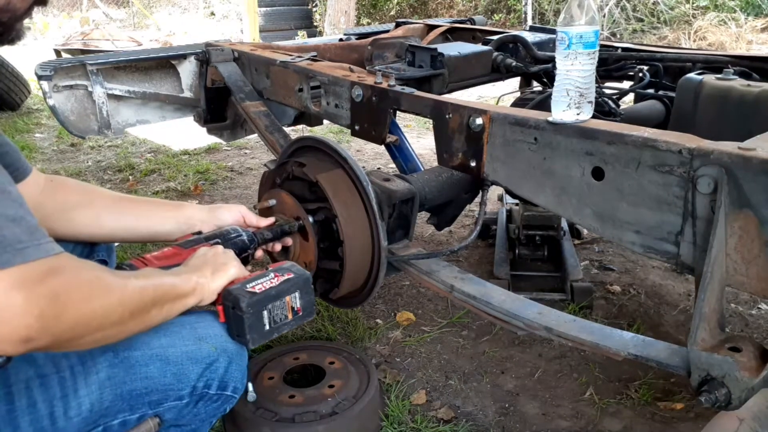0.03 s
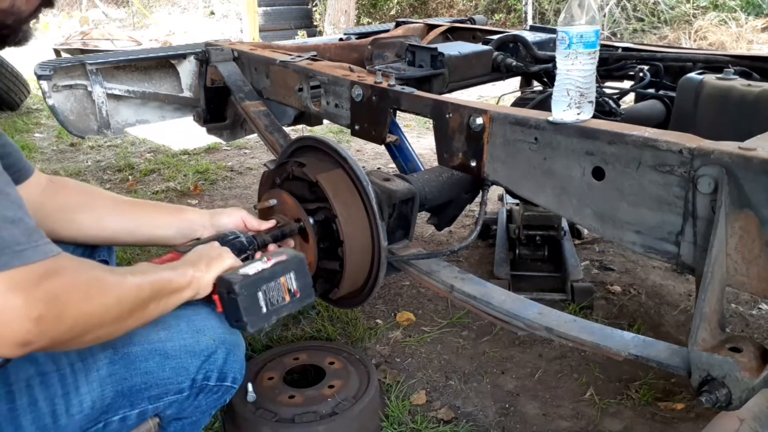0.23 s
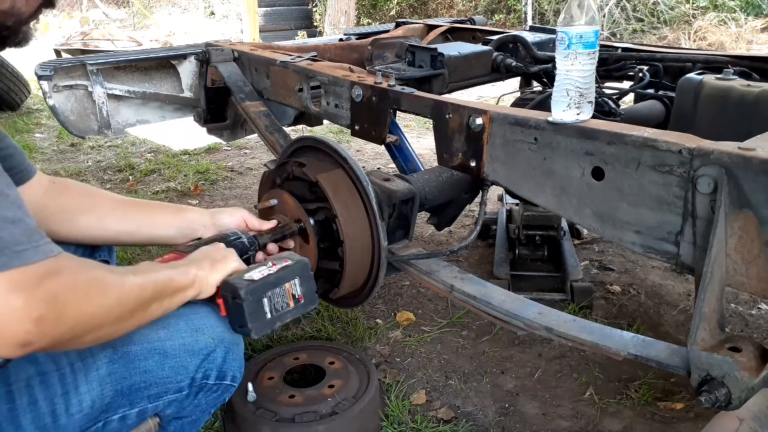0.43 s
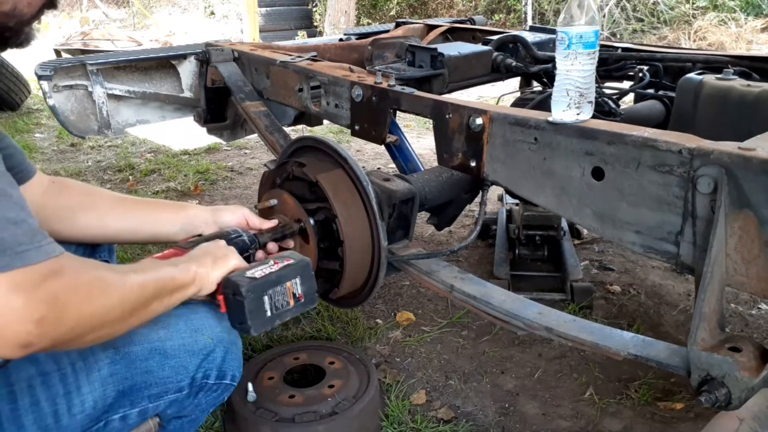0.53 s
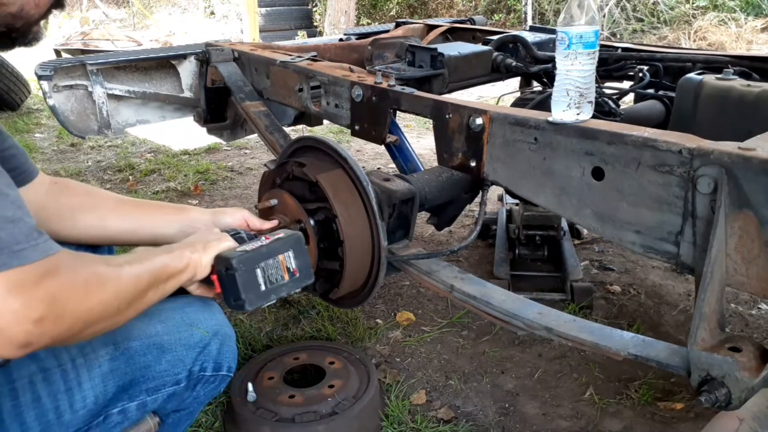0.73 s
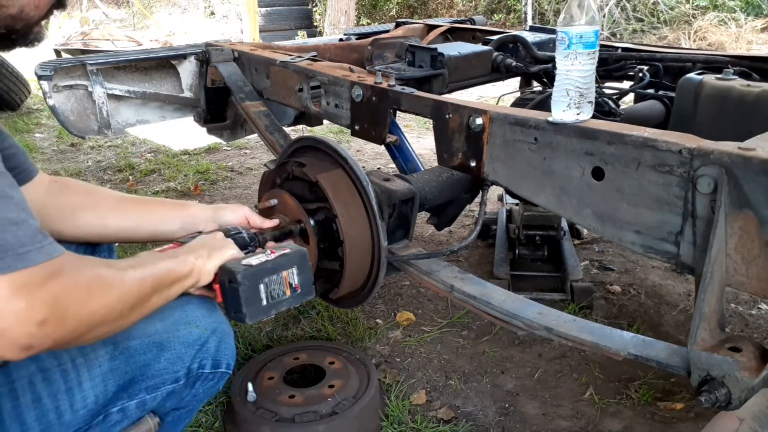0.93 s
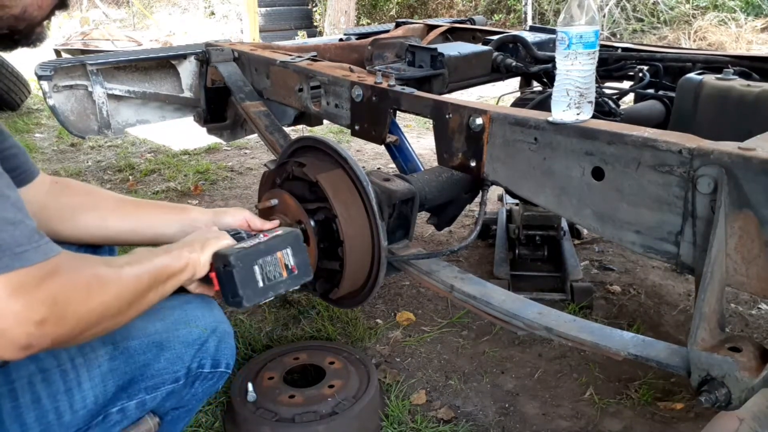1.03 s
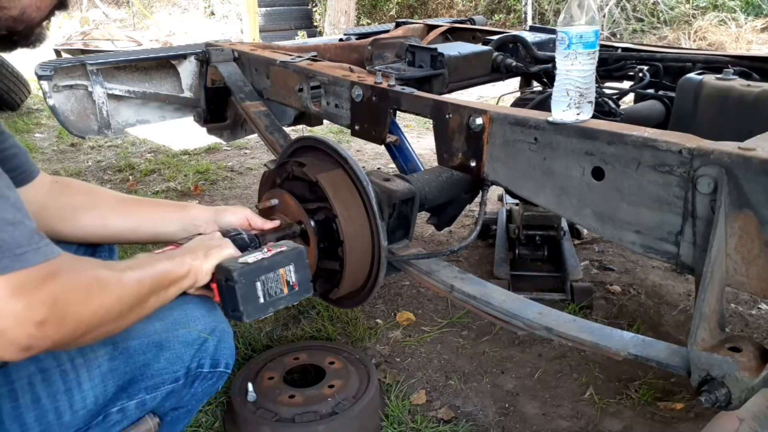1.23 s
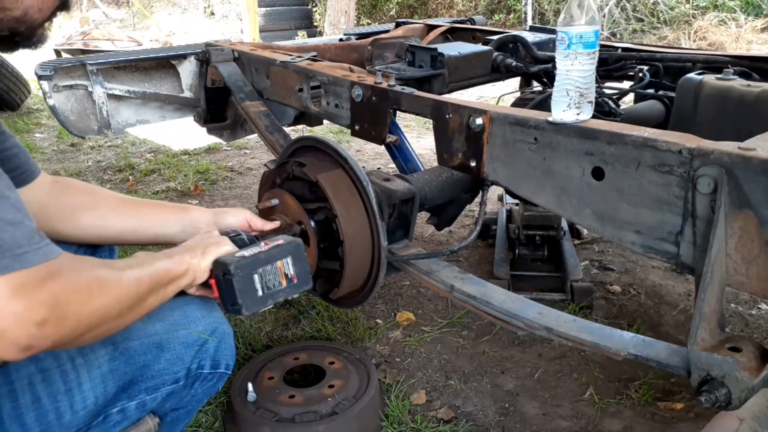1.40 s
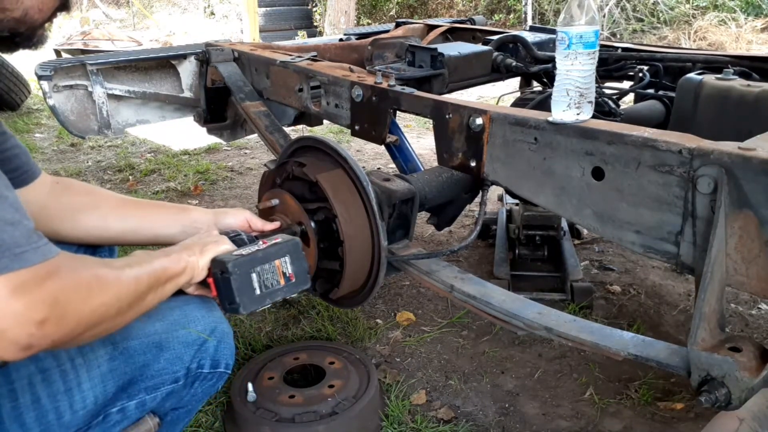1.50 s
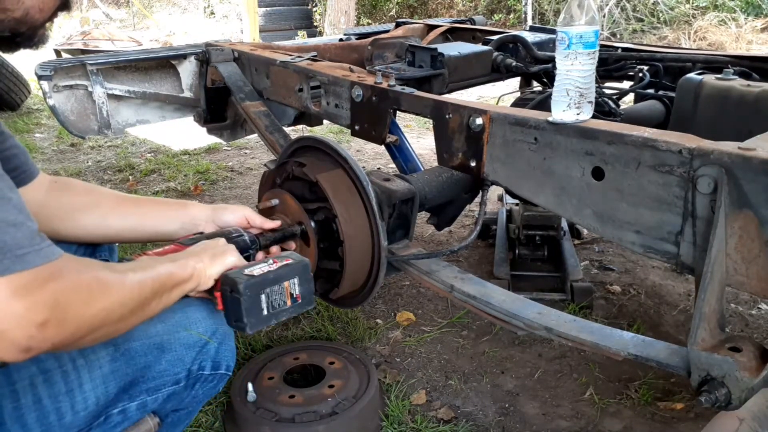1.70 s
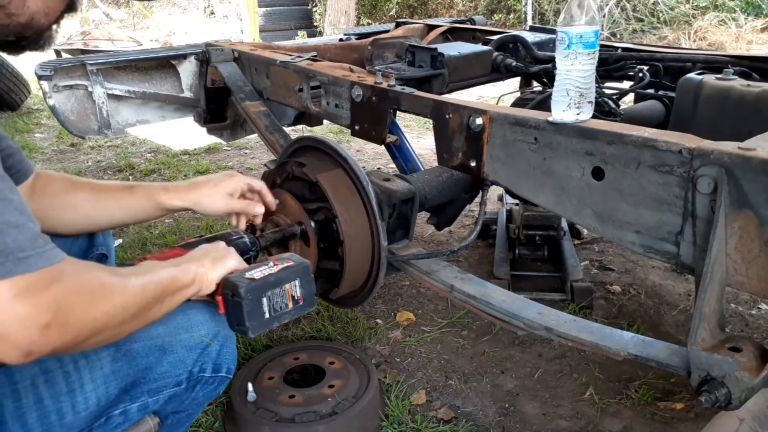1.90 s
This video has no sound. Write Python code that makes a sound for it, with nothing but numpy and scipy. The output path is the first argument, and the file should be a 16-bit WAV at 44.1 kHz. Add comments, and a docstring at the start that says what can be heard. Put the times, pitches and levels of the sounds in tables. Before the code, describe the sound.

A cordless impact wrench runs four short bursts on a wheel nut, close and slightly left, at about 0.2, 0.7, 1.0 and 1.4 seconds. Each starts with small clicks and a motor whine, then rapid hammering rings the steel with a brief echo. The hardest blows thump the microphone near 0.3 and 1.6 seconds. The wrench stops around 1.7 seconds; a faint low hum continues throughout.

```python
"""A cordless impact wrench, close to a stereo microphone pair, runs four short bursts on a truck's wheel nut.
Each time the motor whines and spins up, then the hammer strikes about thirty times a second, often
twice in quick succession. Socket, hub and brake drum ring, and the hardest blows thump the microphones,
mostly the left. The work space answers from all around, and a low hum goes on in the background."""
import sys
import numpy as np
from scipy import signal
from scipy.fft import rfft, irfft
from scipy.io import wavfile
from scipy.ndimage import uniform_filter1d

SR = 44100
rng = np.random.default_rng(int(sys.argv[2]) if len(sys.argv) > 2 else 0)


def to_wav(sig):
    """Store sig (one row per channel, or 1-D mono) as 16-bit WAV at the path in sys.argv[1].

    Samples outside -1..1 are clipped; the rate is SR.
    """
    pcm = np.clip(np.atleast_2d(sig), -1, 1) * 32767
    pcm = np.round(pcm).astype(np.int16)
    wavfile.write(sys.argv[1], SR, pcm.T)  # frames by channels


N = 85995
T = np.arange(N) / SR
TOOL_LEFT_DB = 3  # the wrench sits a little left of centre


def amp(db):
    return 10 ** (np.asarray(db) / 20)

def unit_rms(x):
    return x / np.sqrt(np.mean(x ** 2) + 1e-20)

def curve_at(points, hz):
    f, value = np.transpose(points)
    return np.interp(np.log(hz + 1), np.log(f + 1), value)

def pan(left_db):
    return amp(np.array([[left_db], [-left_db]]) / 2)

def add(mix, s, sound):
    part = mix[:, max(round(s * SR), 0):][:, :sound.shape[-1]]
    part += sound[..., :part.shape[1]]

def colour(x, spectrum):
    """Shapes the spectrum and keeps the power of white noise."""
    gain = unit_rms(amp(curve_at(spectrum, np.fft.rfftfreq(2 * N, 1 / SR))))
    return irfft(rfft(x, 2 * N) * gain)[..., :N]

def drift(hz):
    """A random wander with hz new values a second."""
    return np.interp(T * hz, np.arange(1000), rng.standard_normal(1000))

def mic_noise(size, common=0.53, lag_s=0.00014):
    """Noise at two microphones; the common part reaches the right one a little late."""
    left, other = rng.standard_normal((2, size))
    right = common * np.roll(left, round(lag_s * SR)) + np.sqrt(1 - common ** 2) * other
    return np.array([left, right])

def crack(db, rise_s=0.00034, hold_s=0.0019, fall_s=0.0014, chatter_s=0.0092):
    """Steel on steel: a dense crack, then the socket chatters briefly on the nut."""
    t = T[:SR // 20]
    strike = np.exp(-np.maximum(t - hold_s, 0) / fall_s)
    chatter = amp(-17) * np.exp(-t / chatter_s)
    shape = np.minimum(t / rise_s, 1) * (strike + chatter)
    return amp(db) * unit_rms(mic_noise(len(t)) * shape) * np.sqrt(np.mean(shape ** 2))


# Partials of the background hum: f/Hz, level/dB
HUM_PARTIALS = [(119.5, -47.5), (241, -62), (291, -75), (481, -72), (662, -68), (834, -73.5)]
# The recorder's automatic gain on the background: t/s, gain/dB
BACKGROUND_GAIN = [(0, 3), (.2, 4), (.45, -3.5), (.62, -3.5), (1.0, -4), (1.4, -5), (1.95, -6.5)]
# Spectrum of the air in the work space: f/Hz, level/dB
AIR_SPECTRUM = [(25, -20.5), (55, -2.5), (90, 2.5), (200, -3.5), (350, -9.5), (700, -15.5), (1200, -21),
                (2400, -22), (4000, -26.5), (6700, -39.5), (9000, -30), (15000, -40)]

def hum(waver=0.24):
    """A wavering hum over soft air; the recorder's automatic gain turns both down once hammering starts."""
    partials = np.zeros(N)
    for hz, db in HUM_PARTIALS:
        level = np.sqrt(2) * amp(db) * (1 + waver * drift(hz=24))
        partials += level * np.sin(2 * np.pi * hz * T + waver * drift(hz=7.6))
    gain_db = np.interp(T, *np.transpose(BACKGROUND_GAIN))
    air = amp(-51.5 + 0.53 * gain_db) * colour(mic_noise(N, common=0.64), AIR_SPECTRUM)
    return partials * amp(gain_db) * pan(left_db=1.5) + air * pan(left_db=4)


# Decay of the work space: f/Hz, t60/s
ROOM_DECAY = [(200, 0.33), (600, 0.51), (2000, 0.28), (5000, 0.26), (9000, 0.2277), (15000, 0.19)]
# Its reflections at the microphones: f/Hz, level/dB
ROOM_SPECTRUM = [(100, -2), (230, 3.5), (450, -5), (800, -7), (1500, -8), (3500, -2.5), (6500, -3.5),
                 (10000, -4), (15000, -4)]

def room(direct, build_s=0.0018):
    """Dense reflections from all around the work space, dying faster in the treble."""
    hz, t, bands = signal.stft(rng.standard_normal((2, SR)), SR, nperseg=256)
    t60 = curve_at(ROOM_DECAY, hz)[:, None]
    decay = amp(curve_at(ROOM_SPECTRUM, hz)[:, None] - 60 * t / t60)
    unit_energy = np.sqrt(2 * np.log(1000) / (t60 * SR))
    tail = signal.istft(bands * decay * unit_energy, SR, nperseg=256)[1][:, :SR]
    tail *= np.minimum(T[:SR] / build_s, 1)
    return signal.fftconvolve(direct, tail, axes=1)[:, :N]


# Spectrum of the brake drum's knock: f/Hz, level/dB
KNOCK_SPECTRUM = [(100, -14.5), (400, -10), (650, 1), (1000, 1), (1500, -15.5), (4000, -19), (16000, -55)]

def thumps(blows, push_s=0.00079, swing_hz=60.8, swing_q=1.27, puff_hz=291, bass_cut_hz=30):
    """A hard blow knocks the drum and overloads the microphones: a rough push that swings back."""
    push, knock = np.zeros((2, 2, N))
    age = T[:SR // 50] / push_s
    for s, _, _, strength in blows:
        noise = rng.standard_normal((2, len(age)))  # different at each microphone
        turbulence = unit_rms(signal.lfilter(*signal.butter(2, puff_hz, fs=SR), noise))
        add(push, s, -strength * age * np.exp(1 - age) * (1 + 0.73 * turbulence))
        add(knock, s, strength ** 1.22 * crack(-14.5))  # grows faster than the thump
    w = 2 * np.pi * swing_hz  # the microphones' bass roll-off makes the swing
    swing = signal.lfilter(*signal.bilinear([1, 0, 0], [1, w / swing_q, w * w], SR), push)
    swing = signal.lfilter(*signal.butter(1, bass_cut_hz, "high", fs=SR), swing)
    return (amp(-4.5) * swing + colour(knock, KNOCK_SPECTRUM)) * pan(left_db=7)


# Spectrum of the tool's bright edge, heard close: f/Hz, level/dB
TREBLE_SPECTRUM = [(100, -35), (3000, -26), (5200, -8.5), (6700, -11), (8300, -1), (10500, 2), (12500, 1),
                   (15000, -1), (16500, -4)]

def treble(x, gain_db=2.02):
    """The bright edge of gears, clicks and blows, just left of centre."""
    return amp(gain_db) * colour(x, TREBLE_SPECTRUM) * pan(left_db=1.8)


# Trigger pulls: start t/s, full speed t/s, release t/s, motor level/dB, whine level/dB
TRIGGER_PULLS = [(.188, .252, 0.37, -30, -44), (.672, 0.74, 0.88, -34, -47.5),
                 (1.007, 1.084, 1.233, -31.5, -46), (1.411, 1.496, 1.662, -33, -43.5)]
# Spectrum of the gears, heard close: f/Hz, level/dB
GEAR_SPECTRUM = [(100, -25), (350, -8.5), (650, -2), (1100, -4.5), (1800, 2), (2400, 2.5), (3200, -2.5),
                 (4400, -4), (6500, -15), (16000, -25)]

def motor(mesh_hz=619.5, mesh_depth=0.49, grip_s=0.014, coast_s=0.023, whine_hz=1920, whine_s=0.051):
    """The drive whines as it starts; the gears grow louder and brighter with speed, then coast down."""
    gears, fizz, whine = np.zeros((3, 2, N))
    t = T[:SR // 2]
    for start, full_speed, release, motor_db, whine_db in TRIGGER_PULLS:
        speed = np.minimum(t / (full_speed - start), 1)
        drive = np.minimum(t / grip_s, 1) * np.exp(-np.maximum(start + t - release, 0) / coast_s)
        teeth = drive * (1 + mesh_depth * np.cos(2 * np.pi * np.cumsum(mesh_hz * speed) / SR))
        add(gears, start, teeth * amp(motor_db - 16 * (1 - speed)) * mic_noise(len(t)))
        add(fizz, start, teeth * amp(motor_db - 2 - 34.5 * (1 - speed)) * mic_noise(len(t)))
        pitch_hz = whine_hz + 30 * drift(hz=202)[:len(t)]
        swell = np.minimum(t / 0.0079, 1) * np.exp(-(t / whine_s) ** 2)
        add(whine, start, amp(whine_db) * swell * np.sin(2 * np.pi * np.cumsum(pitch_hz) / SR))
    return (colour(gears, GEAR_SPECTRUM) + whine) * pan(TOOL_LEFT_DB) + treble(fizz, gain_db=0)


# Small clicks at the tool: t/s, tick level/dB, relative treble level/dB
TOOL_CLICKS = [(.1955, -36, -53), (.208, -30.5, -38.5), (.266, -16.5, -26.5), (.274, -29, -19),
               (.2925, -20.5, -28), (.733, -30.5, -43), (1.0245, -41, -32), (1.047, -31, -46),
               (1.062, -36, -36), (1.4128, -35, -68), (1.459, -32.5, -37)]
# Spectrum of their tick: f/Hz, level/dB
TICK_SPECTRUM = [(100, -13.5), (500, -5.5), (900, -6), (1700, 2.5), (2300, -0.5), (3000, -23),
                 (5000, -16.5), (7000, -29), (16000, -42)]

def clicks():
    """The trigger and the loose socket click, duller than the blows."""
    tick, edge = np.zeros((2, 2, N))
    for s, tick_db, treble_db in TOOL_CLICKS:
        add(tick, s, crack(tick_db))
        add(edge, s, crack(treble_db))
    return colour(tick, TICK_SPECTRUM) * pan(TOOL_LEFT_DB) + treble(edge)


# Modes of socket, hub and brake drum: f/Hz, relative level/dB, t60/s
STEEL_MODES = [(414, -7.5, 0.42), (449.6, -6, 0.35), (1054, -5, 0.45), (1202, -11, 0.22), (1567, 3, .18),
               (1840, -9, .18), (2064, -3, 0.17), (2270, -3.5, .2), (2437, -9, 0.14), (2470, -2, 0.13),
               (2750, -4, 0.31), (3740, -3.5, 0.25), (4066, 0.5, 0.18), (4930, -2.5, 0.17)]

def steel_ring(gain_db):
    """The steel rings after one blow; each mode meets each microphone at a random phase."""
    t = T[:SR // 3]
    modes = [amp(db - 60 * t / t60) * np.exp(2j * np.pi * hz * t) for hz, db, t60 in STEEL_MODES]
    phases = np.exp(2j * np.pi * rng.random((2, len(modes))))
    return amp(gain_db) * (phases @ np.array(modes)).real / 2


# Blows on the wheel nut: t/s, relative clank level/dB, relative treble level/dB, thump strength/0-1
HAMMER_BLOWS = [(0.2598, -12, -13, 0), (0.2832, -15, -20, 0.02), (0.305, -19.5, -13.5, 0.94),
                (.3301, -20, -20, 0), (0.3379, -17, -12.5, 0.36), (.3665, -24.5, -27, 0.05),
                (.376, -17.5, -16.5, 0.18), (0.7604, -16.5, -17, 0.09), (.7856, -21.5, -25, 0),
                (0.794, -17, -15.5, 0.21), (0.8195, -25.5, -17.5, .01), (0.8274, -21, -21, 0.05),
                (0.8558, -17.5, -20, 0), (0.8657, -25.5, -14, 0.15), (1.0895, -20, -21, 0.06),
                (1.1148, -20.5, -20, 0), (1.1225, -15.5, -12.5, 0.26), (1.1459, -28, -26, 0),
                (1.1554, -18.5, -16, .16), (1.1883, -15, -14.5, 0.21), (1.2166, -23.5, -28, 0.04),
                (1.2257, -18, -13.5, 0.1), (1.4727, -15, -16.5, 0.19), (1.505, -17.5, -18.5, 0.04),
                (1.5146, -22.5, -22, 0.03), (1.5376, -29, -29, 0), (1.5458, -18, -15.5, 0.14),
                (1.5716, -24, -33, 0.04), (1.5787, -14.5, -13, 0.75), (1.6029, -22, -26, 0.04),
                (1.6114, -17.5, -15, .2), (1.6444, -20, -19.5, 0), (1.6576, -20, -20, 0),
                (1.6897, -25, -27, 0.03)]
# Spectrum of the clank, heard close: f/Hz, level/dB
CLANK_SPECTRUM = [(100, -15), (250, -3.5), (400, -5.5), (700, -0.5), (1100, -3.5), (1700, 1.5), (2500, 1),
                  (3300, -2.5), (4500, -2.5), (6500, -11), (10000, -22.5), (16000, -30.5)]

def hammer():
    """In the foreground, each hammer blow clanks with a bright edge and sets the steel ringing."""
    clank, edge, ring = np.zeros((3, 2, N))
    for s, clank_db, treble_db, _ in HAMMER_BLOWS:
        add(clank, s, crack(clank_db))
        add(edge, s, crack(treble_db))
        add(ring, s, steel_ring(clank_db - 20))
    body = amp(1.34) * colour(clank, CLANK_SPECTRUM) + ring
    return body * pan(TOOL_LEFT_DB) + treble(edge)


def scene():
    """At the microphones: the close wrench, its reflections, the thumps and the hum behind."""
    wrench = hammer() + clicks() + motor()
    return wrench + room(wrench) + thumps(HAMMER_BLOWS) + hum()

def record(dry):
    """The recorder's limiter ducks briefly after the hardest blows; then soft overload and a band limit."""
    threshold_db, excess_cut, recover_db_per_s = -14, 0.69, 164.5
    ceiling, top_hz = 1.13, 15650
    power_db = 10 * np.log10(abs(uniform_filter1d((dry ** 2).mean(0), size=130)) + 1e-12)
    recovery_db = T * recover_db_per_s
    held_db = np.maximum.accumulate(power_db + recovery_db) - recovery_db
    excess_db = np.maximum(held_db - threshold_db, 0)
    ducked = dry / amp(excess_cut * uniform_filter1d(excess_db, size=60))
    saturated = ceiling * np.tanh(ducked / ceiling)
    lowpass = signal.firwin(255, top_hz, window=("kaiser", 9), fs=SR)
    return signal.oaconvolve(saturated, lowpass[None], "same")


dry = scene()
out = record(dry)
to_wav(out)
```